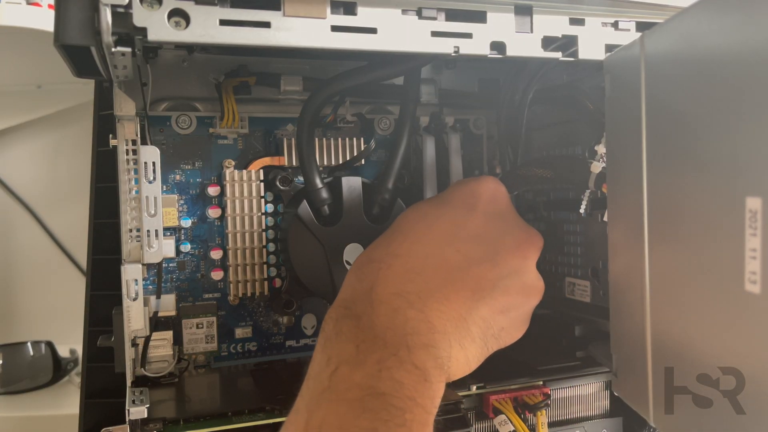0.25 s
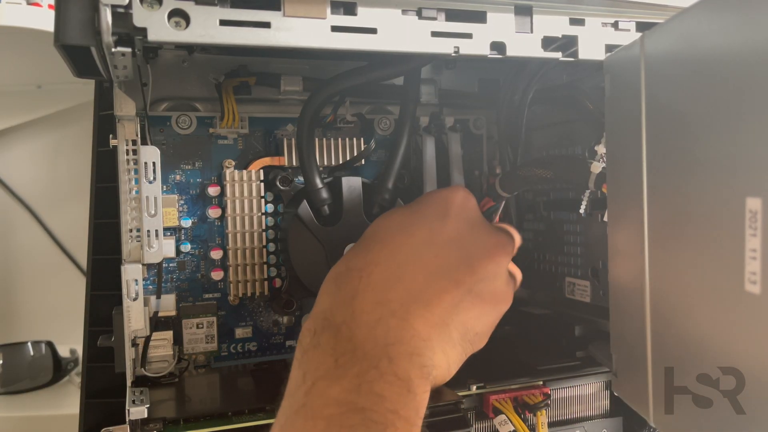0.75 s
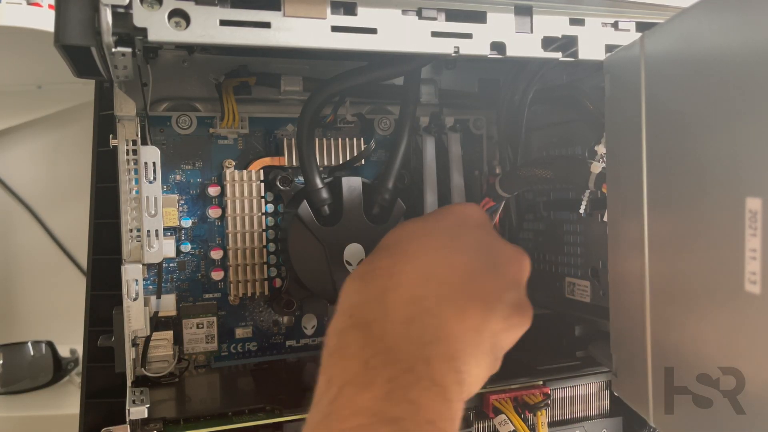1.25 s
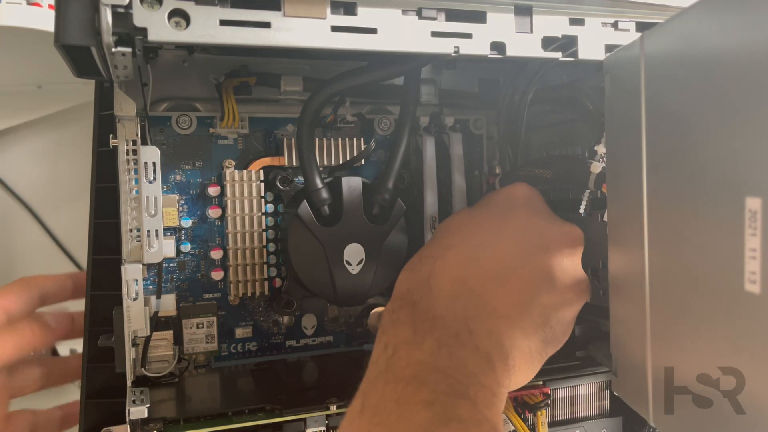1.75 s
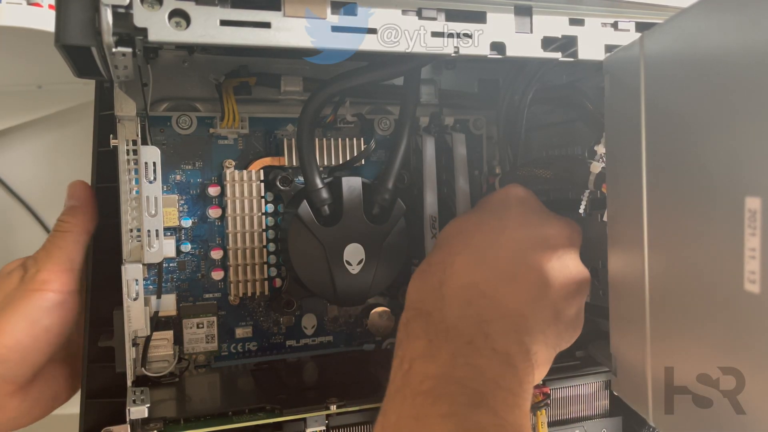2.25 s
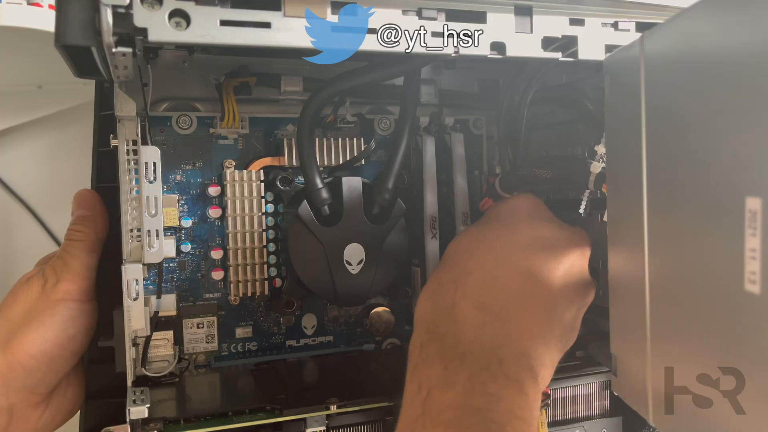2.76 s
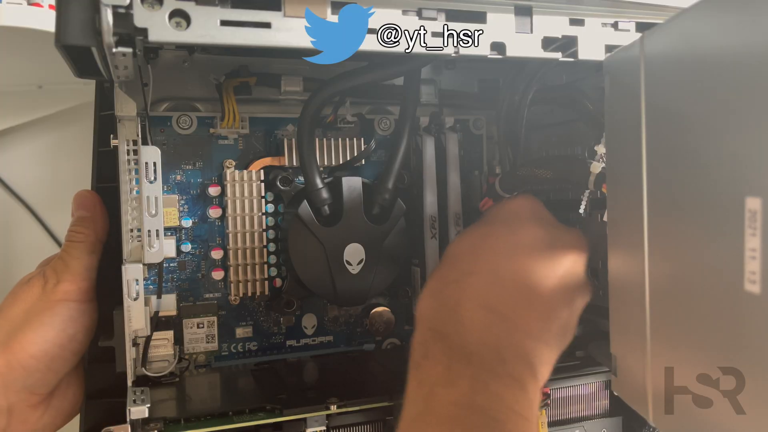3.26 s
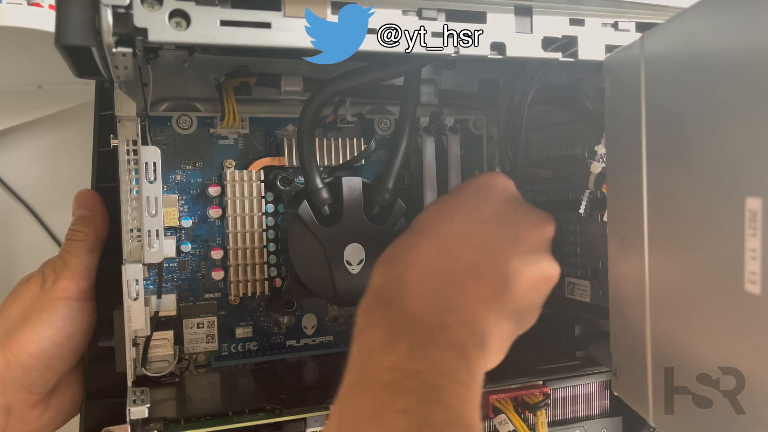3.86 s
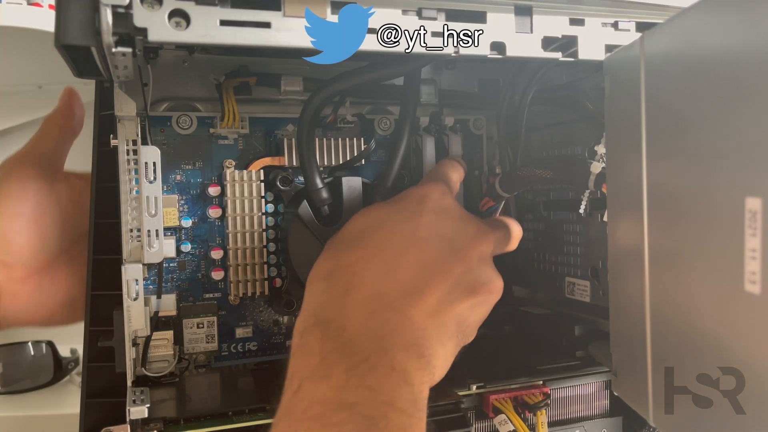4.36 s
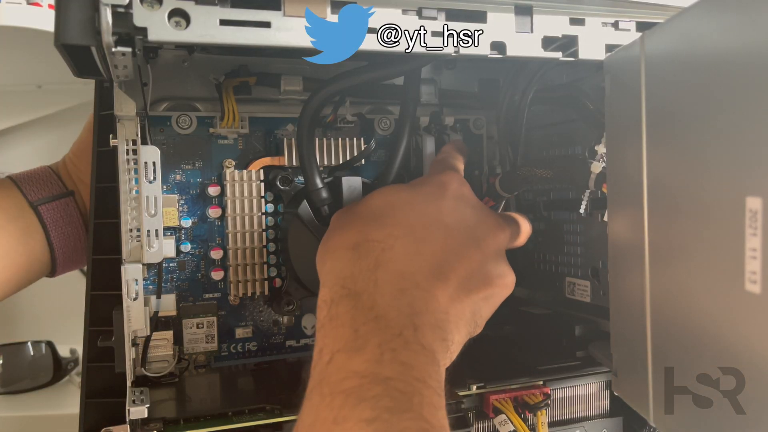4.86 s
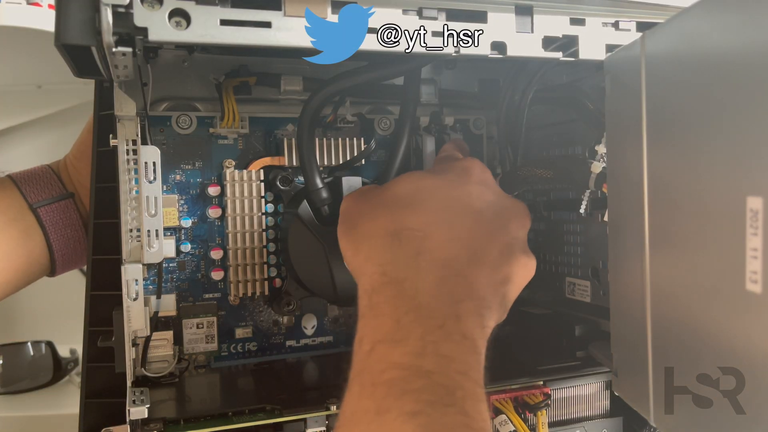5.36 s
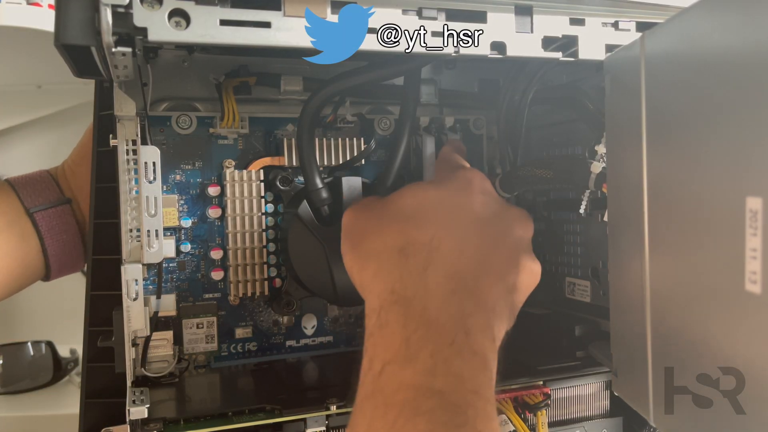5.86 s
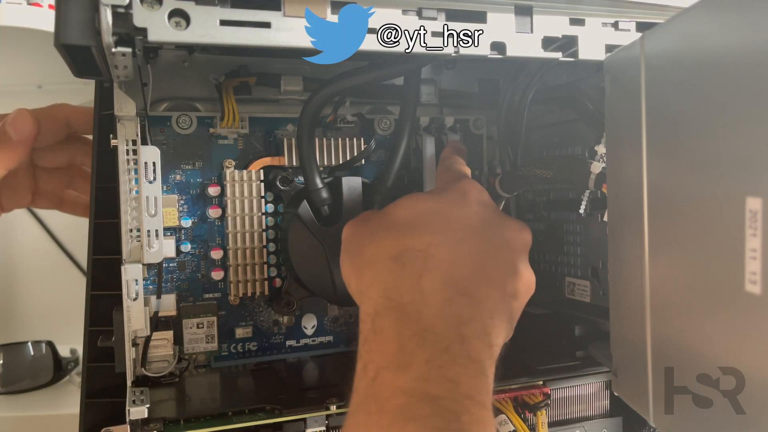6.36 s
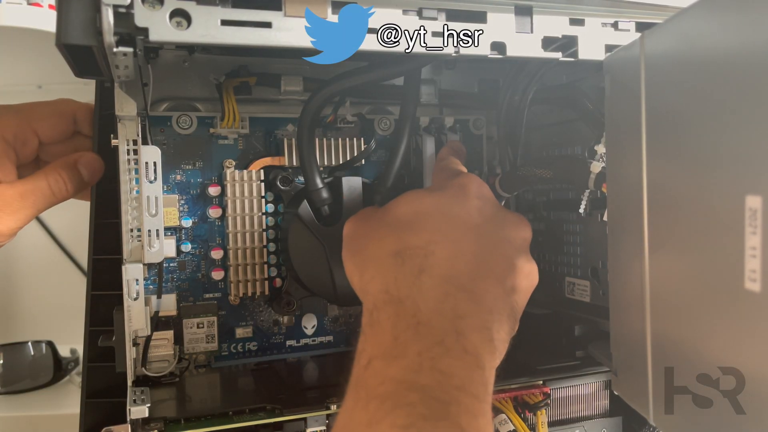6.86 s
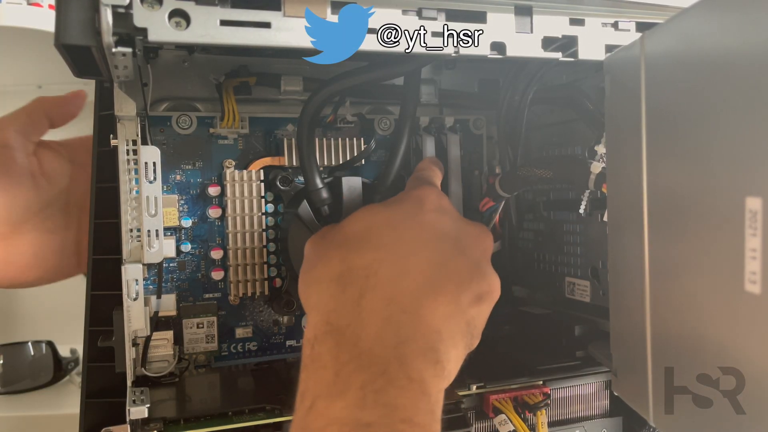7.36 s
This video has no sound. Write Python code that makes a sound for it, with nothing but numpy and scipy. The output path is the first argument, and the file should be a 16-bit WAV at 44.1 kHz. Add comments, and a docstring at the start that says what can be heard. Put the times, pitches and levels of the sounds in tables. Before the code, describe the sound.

Inside an open metal computer case in a quiet room, a memory stick is handled close to a stereo microphone. A firm click and knock come early, then scattered taps, brief scrapes and dull panel thumps. After a near-quiet pause, one very loud plastic snap cracks out late, followed by small soft touches over a faint low hum.

```python
"""Inside an open steel computer case in a quiet room, a phone with two microphones listens from above.
Room noise, a low hum and the soft rub of fingers on plastic run throughout.
From the first half second a memory stick is handled: noise bursts through plastic resonances click and drag,
and each push knocks the case panels, summed as decaying sine partials. At 5.59 s comes the loudest snap,
then smaller touches until the end. Decaying noise gives the knocks and clicks their room echo."""
import sys
import numpy as np
from scipy import signal
from scipy.fft import rfft, irfft, next_fast_len
from scipy.io import wavfile
from scipy.ndimage import uniform_filter1d, map_coordinates

SR = 44100
rng = np.random.default_rng(int(sys.argv[2]) if len(sys.argv) > 2 else 0)


def dump(signal):
    """Clip the signal to [-1, 1] and save it as 16-bit WAV at the path in sys.argv[1]."""
    limited = np.clip(np.atleast_2d(signal).T, -1, 1)
    pcm = np.round(limited * 32767).astype(np.int16)
    wavfile.write(sys.argv[1], SR, pcm)


N = 335601

# Room noise, relative spectrum: pitch_hz, density_db (per Hz)
ROOM_SPECTRUM = [(20, -46), (39, -18), (65, -12.5), (230, -12.5), (620, -17), (1500, -29), (2300, -38),
                 (3300, -50), (11600, -57.5), (14000, -76.5)]
# Course of the distant hum before it wavers: time_s, pitch_hz, level_db
HUM_COURSE = [(0, 53.8, -61), (2, 54.7, -54), (3.2, 54.1, -60), (3.6, 57.14, -64), (4.7, 58, -68.5),
              (5.25, 58, -56.5), (5.7, 58.57, -65.5), (7.61, 59.54, -66)]
# Likeness of the two microphones: pitch_hz, likeness (0 to 1)
SIDE_LIKENESS = [(60, 1), (250, 0.55), (900, 0)]
# Decay of the room echo: pitch_hz, t60_s
WALL_DECAY = [(150, 0.499), (600, 0.35), (2500, 0.54), (5000, 0.37), (12000, 0.26)]
# Skin sliding on plastic: time_s, level_db
RUB_COURSE = [(0, -95), (2.2, -77.5), (3.1, -91.5), (4.3, -75), (5.1, -90), (7.61, -86)]
# Skin on plastic, relative spectrum: pitch_hz, density_db (per Hz)
SKIN_SPECTRUM = [(1180, -25.5), (2000, 3), (3280, -8), (6680, -16.5), (8980, -18), (11300, -11),
                 (13500, -31)]
# Mode groups of case and board, lightly pushed: pitch_hz, level_db, t60_s
CASE_MODES = [(110.6, 0.5, 0.28), (143.4, 2, 0.48), (160.7, 0.5, 0.2), (208, -3, 0.48), (253.5, 3, 0.11),
              (303, -7, 0.22), (382.1, -2.5, 0.11), (434.6, -6, 0.2), (562.4, -1, 0.12), (668.5, -8, 0.19),
              (756.2, -4, 0.15), (921, -1, 0.095), (1110, -5, 0.099), (1372, -10.5, 0.12),
              (1752, -7.5, 0.063)]
# Pushes that reach the case: start_s, level_db, boom_db (big panels), rap_db (board), panel_hz (favoured)
PUSHES = [(0.5, -46.5, -4.5, -24, 250), (0.517, -30, -17.5, 0.5, 755), (0.528, -38.5, -22, 0, 556),
          (0.543, -39.5, -5.5, -5, 254), (0.773, -47, -5.5, 3, 790), (0.785, -38.5, -10.5, -17, 254),
          (1.292, -65.5, -26, 16.5, 1140), (1.311, -32, -25, 3, 515), (1.963, -41, -20, -1, 265),
          (2.284, -54, -6, -14, 258), (2.775, -51, -8, -1, 745), (2.802, -43, -21, -16.5, 230),
          (3.262, -32.5, -17, 0.5, 860), (3.289, -33, -9.5, -5.5, 136), (3.3361, -43, -8, -5, 900),
          (3.396, -44.5, -8.5, -3.5, 257), (4.047, -50.5, -3.5, -1.5, 470), (4.627, -64, -7, 4.5, 253.8),
          (4.759, -54.5, -2.5, -2, 560), (4.78, -52.5, -9, -6, 198), (5.5903, -16, -16.5, -7.5, 275.2),
          (5.906, -53, -16, -6, 217), (5.959, -52.5, -8, -3.5, 203), (6.171, -66, -20, 4, 1100),
          (7.108, -53.5, -8, 4.5, 380), (7.548, -42.5, -6.5, -1.5, 274)]
# Resonances of stick and latch plastic, as drags wake them: pitch_hz, width_hz, level_db
PLASTIC_MODES = [(1346, 730, 6.5), (2340, 660, -2), (2770, 680, -3.5), (4433, 1200, -6.5), (5200, 1300, -5),
                 (6520, 800, -4), (9230, 990, 0), (11380, 1200, -1.5)]
# Contacts of stick, slot and latch: start_s, level_db, treble_db (against the middle), part_hz (part hit)
CONTACTS = [(0.341, -64.5, -12, 9200), (0.516, -29.5, -11.5, 2090), (0.5413, -38.5, -9, 4060),
            (0.752, -61.5, -9, 2277), (0.772, -37.5, -4, 3120), (0.789, -46, -19, 11600),
            (1.293, -47, -14, 11500), (1.3108, -37, -12.5, 2130), (1.961, -49, -15, 11000),
            (2.2126, -49, -2, 4080), (2.7728, -49.5, -2, 2040), (2.791, -55, -16, 12000),
            (2.917, -65, -7, 4500), (3.021, -68, -13, 4130), (3.263, -35, -1.5, 2000),
            (3.3367, -47.5, -15, 2030), (3.3916, -48, -6, 2730), (3.5061, -57.5, -41, 2586),
            (3.519, -58.5, -40, 2630), (3.6364, -60.5, -18, 2070), (4.0441, -47, -23, 11300),
            (4.049, -50, -4, 1340), (4.104, -55, 1, 9300), (4.1106, -56, 3, 8800),
            (4.2194, -44, -12.5, 4550), (4.2564, -60.5, -8, 3120), (4.623, -64.5, -15, 3360),
            (4.852, -61, -14, 4600), (5.5902, -15, -1.5, 2350), (5.958, -64, -19, 4950),
            (5.993, -53, -30, 2210), (6.071, -61, -19, 4010), (6.171, -54, -34, 1584),
            (7.082, -63, -20, 2650), (7.1056, -44, -17.5, 3010), (7.5507, -50.5, -43, 1880)]
# Stick and fingers dragging along the slot: strongest_s, length_s, level_db, treble_db (against the middle)
DRAGS = [(0.516, 0.12, -47, -8), (1.099, 0.085, -71.5, -12), (2.25, 0.27, -74, 0), (2.797, 0.05, -55.5, 2),
         (3.277, 0.07, -41.5, -7), (3.406, 0.076, -55, -5), (3.983, .19, -72, -26), (4.108, 0.17, -63, 2),
         (4.281, 0.11, -65.5, -1), (4.605, 0.32, -73, -7), (4.783, 0.15, -65, -10.5), (4.87, .07, -68, -2),
         (5.029, 0.11, -67, -22), (5.918, 0.12, -62.5, -10), (5.973, 0.099, -60, -11),
         (7.095, 0.035, -64, -19), (7.553, 0.06, -59, -5)]
# The case lies towards the left microphone: pitch_hz, left_over_right_db
CASE_LEAN = [(150, 1), (700, 5), (4400, 6), (8000, 2)]
# Colour of the microphone port: pitch_hz, gain_db
PORT_COLOUR = [(20, 2), (9000, 0.5), (10300, -9), (11400, 6), (12600, -4.5), (14300, -30), (15200, -13),
               (16500, -18.5)]

TOP_HZ = 16560  # band limit of the microphones
ROOM_DB = -58.5  # room noise before it stirs
FREE_BELOW_DB, DAMPING_PER_DB = -38.5, 0.07  # harder pushes keep the hand on the board and shorten the ring
LAG_S = 0.0024  # low bending waves arrive late: delay at 250 Hz
PART_DB, PART_Q = 9, 7  # how much and how sharply the part that is hit stands out
STRIKE_S = 0.00087  # time for the strike to reach its peak
RING_DB, RING_GROWS = -2.5, 0.12  # ring of the plastic at FREE_BELOW_DB, and its extra dB per dB of blow
RING_NARROWS, RATTLE_WIDENS = 0.32, 1.3  # factors on the resonance widths
THIN_SHARE, THIN_TOP_HZ = 0.45, 2000  # small parts give little below this share of their pitch, at most this
SWELL_SHARE = 0.41  # part of a drag spent growing
SLIP_S, SLIP_DB, DRAG_VARIES_DB = 0.009, 3, 2  # a drag sticks and slips; each wakes other resonances


def amp(db):
    """Gain of a level in dB."""
    return np.exp(np.asarray(db) * np.log(10) / 20)


def unit(x):
    """x at rms 1."""
    return x / np.sqrt(np.mean(x ** 2) + 1e-20)


def along(points, hz):
    """Read (Hz, value) points on a log frequency axis."""
    f, v = np.transpose(points)
    return np.interp(np.log(hz + 1), np.log(f + 1), v)


def curves(rows):
    """One value per sample for each column after the time."""
    s, *cols = np.transpose(rows)
    return [np.interp(np.arange(N) / SR, s, c) for c in cols]


def wobble(rate):
    """A smooth random curve with rate knots a second."""
    knots = rng.standard_normal(int(N * rate / SR) + 4)
    return map_coordinates(knots, [np.arange(N) * rate / SR])


def filtered(x, response):
    """x shaped by a complex response of frequency."""
    n = x.shape[-1]
    m = next_fast_len(n + 2048)
    return irfft(rfft(x, m) * response(np.fft.rfftfreq(m, 1 / SR)), m)[..., :n]


def resonance(f, hz, width):
    """A damped resonance passes most at its own pitch."""
    return 1j * f * width / (hz ** 2 - f * f + 1j * f * width)


def add_at(out, start_s, sound):
    """Lay a sound into out from start_s on."""
    out[..., round(start_s * SR):][..., :sound.shape[-1]] += sound


def sides(pan_db):
    """Left and right gains for a source pan_db stronger on the left."""
    return amp([[pan_db / 2], [-pan_db / 2]])


def paired(x):
    """Two unrelated signals made alike on both sides in the bass, where the waves are long."""
    turn = lambda hz: np.arccos(np.clip(along(SIDE_LIKENESS, hz), -1, 1)) / 2
    mid, side = filtered(x, lambda hz: np.array([np.cos(turn(hz)), np.sin(turn(hz))]))
    return np.array([mid + side, mid - side])


def rush(spectrum, patchy_db):
    """Stereo noise of rms 1 with patches of random gain in time and pitch."""
    z = signal.stft(rng.standard_normal((2, N)), nperseg=512)[2]
    field = uniform_filter1d(rng.standard_normal(z.shape[1:]), 6, 0)
    field = uniform_filter1d(field, 10, 1)
    pair = signal.istft(z * amp(patchy_db * unit(field)), nperseg=512)[1][:, :N]
    return unit(paired(filtered(pair, lambda hz: amp(along(spectrum, hz)))))


def room_noise():
    """The quiet room: broad noise that stirs slightly in level."""
    stir_db = 0.9 * wobble(6)
    return amp(ROOM_DB + stir_db) * rush(ROOM_SPECTRUM, patchy_db=2.0)


def hum():
    """A distant low hum: one sine whose pitch and strength waver."""
    hz, db = curves(HUM_COURSE)
    hz = hz + 3.6 * wobble(4.9)
    db = db + 3.1 * wobble(16)
    return np.sqrt(2) * amp(db) * np.sin(2 * np.pi * np.cumsum(hz) / SR)


def walls(x):
    """The room answers with decaying noise; each frequency dies at its own speed."""
    hz, t, z = signal.stft(rng.standard_normal((2, SR // 2)), SR, nperseg=256)
    decay = amp(-60 * t / along(WALL_DECAY, hz)[:, None])
    tail = paired(signal.istft(z * decay, SR, nperseg=256)[1])
    delayed = np.pad(x, ((0, 0), (300, 0)))  # 300 samples
    return signal.fftconvolve(delayed, tail / np.linalg.norm(tail[0]), axes=1)[:, :N]


def fingers():
    """Skin slides over plastic in uneven slips, heard as noise of wavering strength."""
    slips = amp(2.7 * wobble(150) + 1.5 * wobble(7.3))
    return amp(curves(RUB_COURSE)[0]) * unit(slips * rush(SKIN_SPECTRUM, patchy_db=-4.5))


def knocks():
    """Each push rings the case: every mode group is four close partials that beat; low ones swell slowly."""
    out, t = np.zeros((2, N + SR)), np.arange(SR // 5) / SR
    hz, level_db, t60 = (np.repeat(c, repeats=4)[:, None] for c in np.transpose(CASE_MODES))
    spread = 0.034 * (np.arange(len(hz))[:, None] % 4 - 3 / 2)  # the partials of a group lie side by side
    late = np.maximum(t - LAG_S * np.sqrt(250 / hz), 0)
    swell = 1 - np.exp(-late / (0.0021 + 0.57 / hz))
    fade = np.cos(np.pi / 2 * t / t[-1])
    for start, db, boom_db, rap_db, panel_hz in PUSHES:
        damping = 1 + DAMPING_PER_DB * max(db - FREE_BELOW_DB, 0)
        chance = rng.standard_normal((4, len(hz), 1))
        share_db = along([(150, boom_db), (300, 0.00048), (450, 0), (850, rap_db)], hz)
        share_db = share_db + 6.6 * np.exp(-(np.log(hz / panel_hz) / 0.1) ** 2)  # the panel under the hand
        decay_db = -60 * late * damping / t60
        envelope = amp(level_db + share_db + 1.7 * chance[0] + decay_db) * swell * fade
        phase = 2 * np.pi * hz * (1 + spread + 0.012 * chance[1]) * t + 0.88 * chance[2]
        # Short waves reach the two microphones out of step
        skew = np.minimum(hz / 1700, 0.9) * (1 + 0.5 * chance[3])
        ring = np.array([np.sum(envelope * np.sin(phase + way * skew), axis=0) for way in (1, -1)])
        add_at(out, start, amp(db) * ring)
    return out[:, :N]


def plastic(shape, treble_db, grit_db, modes, varies_db=0.2, rung=False):
    """Gritty noise through plastic resonances: rung together by a blow, else adding as powers."""
    grit = np.repeat(rng.standard_normal(len(shape) // 32 + 1), repeats=32)[:len(shape)]
    noise = shape * amp(grit_db * grit) * rng.standard_normal((2, len(shape)))
    tilt = [(3700, 0.011), (10000, treble_db)]
    strengths = rng.normal(0, varies_db, len(modes))

    def body(f):
        """The resonances, in alternating sign, under the treble tilt."""
        each = np.array([(-1) ** k * amp(db + strengths[k]) * resonance(f, hz, width)
                         for k, (hz, width, db) in enumerate(modes)])
        together = each.sum(axis=0) if rung else np.linalg.norm(each, axis=0)
        return amp(along(tilt, f)) * together

    # Even out the mean power between 1.8 and 13 kHz
    gain = 1 / np.sqrt(np.mean(np.abs(body(np.linspace(1800, 13000, num=200))) ** 2))
    return gain * filtered(noise, body)


def drags():
    """Stick and fingers stick and slip along the slot: plastic noise in uneven steps that swells and fades."""
    out = np.zeros((2, N + SR))
    for strongest, length, db, treble_db in DRAGS:
        start, t = strongest - SWELL_SHARE * length, np.arange(round(length * SR)) / SR
        shape = np.interp(t / length, [0, SWELL_SHARE, 1], [0, 1, 0]) ** 2
        step_db = SLIP_DB * rng.standard_normal(len(t))[(t / SLIP_S).astype(int)]
        sound = plastic(shape * amp(step_db), treble_db, grit_db=2.5, modes=PLASTIC_MODES,
                        varies_db=DRAG_VARIES_DB)
        add_at(out, start, amp(db) * sound)
    return out[:, :N]


def clicks():
    """Each contact rings the plastic, bursts at the pitch of the part hit, then rattles more dully.
    Returns the sound heard close by and the blurred share that spreads to the walls."""
    out, t = np.zeros((2, 2, N + SR)), np.arange(SR // 8) / SR
    strike = t / STRIKE_S * np.exp(1 - t / STRIKE_S)
    rise = np.minimum(t / 0.0023, 1) ** 2
    narrow = [(hz, RING_NARROWS * width, db) for hz, width, db in PLASTIC_MODES]
    wide = [(hz, RATTLE_WIDENS * width, db) for hz, width, db in PLASTIC_MODES]
    for start, db, treble_db, part_hz in CONTACTS:
        burst_shape = rise * amp(1.5 - 60 * t / 0.031)
        burst = plastic(burst_shape, treble_db + 9.0, grit_db=3.5, modes=wide)
        rattle_shape = rise * amp(-4.0 - 60 * t / 0.09)
        rattle = plastic(rattle_shape, treble_db, grit_db=1.0, modes=wide)
        # The blow itself rings the plastic, more so when harder
        ring_shape = strike * amp(RING_DB + RING_GROWS * (db - FREE_BELOW_DB))
        ring = plastic(ring_shape, treble_db, grit_db=1, modes=narrow, rung=True)
        part = lambda f: 1 + amp(PART_DB) * resonance(f, part_hz, part_hz / PART_Q)
        close = filtered(ring + burst, part) + rattle
        edge = min(THIN_SHARE * part_hz, THIN_TOP_HZ)
        thin = lambda f: (1j * f / (edge + 1j * f)) ** 2
        add_at(out, start, amp(db) * filtered(np.array([close, burst + rattle]), thin))
    return out[..., :N]


def scene():
    """Work in the case, its echo, and the quiet room."""
    close, blurred = clicks() + drags()  # drags are the same in both shares
    deep = knocks()
    echo = walls(amp(-12.0) * blurred + amp(-11.5) * deep.mean(axis=0))
    lean = lambda hz: amp(along(CASE_LEAN, hz) * np.array([[0.5], [-0.5]]))
    work = filtered(close + deep, lean)
    return sides(0.81) * room_noise() + sides(2.2) * hum() + fingers() + echo + work


def record(dry):
    """The microphone port colours the treble; nothing passes above the band limit."""
    return filtered(dry, lambda hz: amp(along(PORT_COLOUR, hz)) * (hz < TOP_HZ))


dry = scene()
out = record(dry)
dump(out)
```